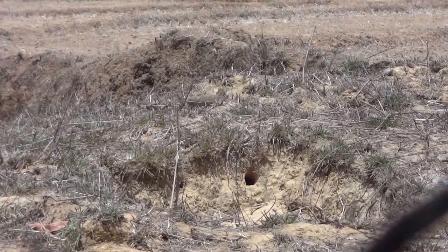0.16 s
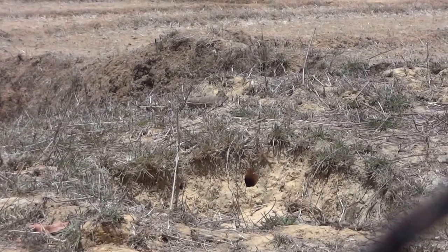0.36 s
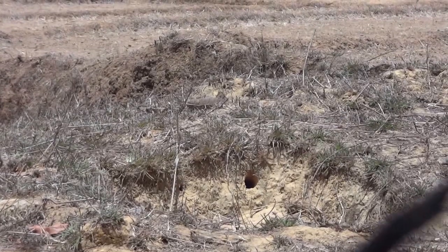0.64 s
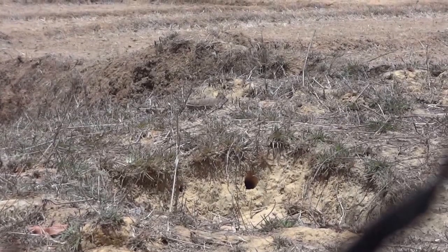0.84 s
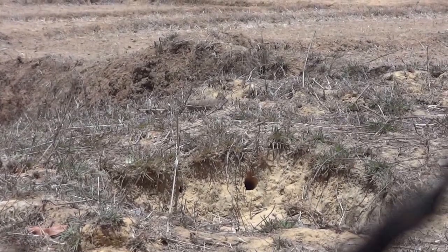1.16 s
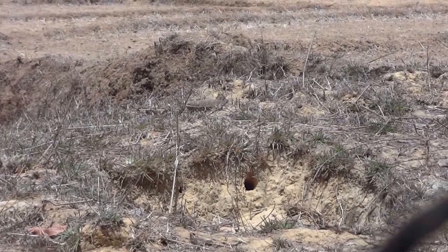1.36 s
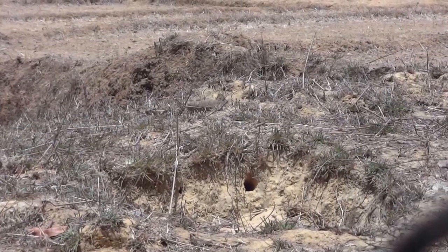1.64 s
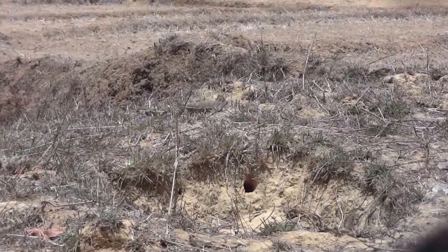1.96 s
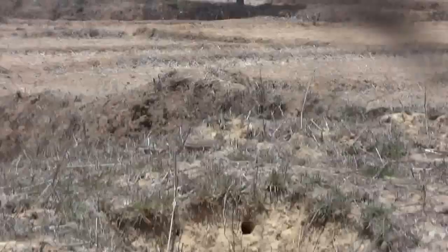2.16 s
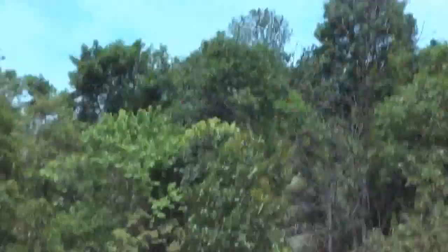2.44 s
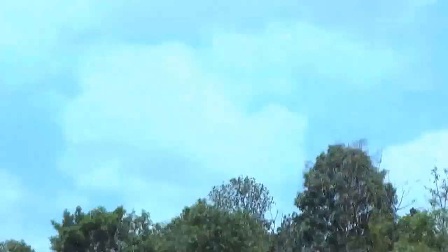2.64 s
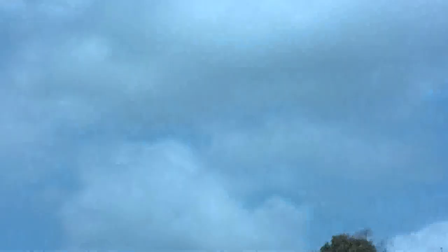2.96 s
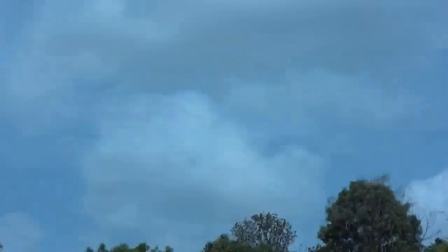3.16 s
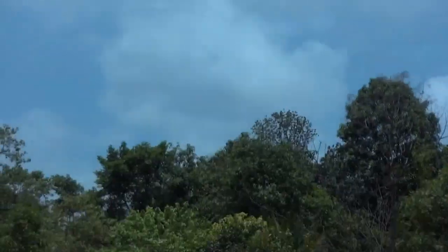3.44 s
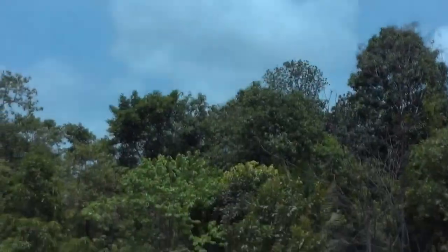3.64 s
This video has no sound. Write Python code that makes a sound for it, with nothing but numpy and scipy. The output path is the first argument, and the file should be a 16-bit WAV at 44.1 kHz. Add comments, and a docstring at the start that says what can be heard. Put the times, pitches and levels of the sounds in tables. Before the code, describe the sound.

Thin pure bird whistles repeat evenly from the start, lightly echoing off trees and an earth bank. Dry grass hisses around them, low wind bumps hit the microphone early, then stalk ticks and soft swishes.

```python
"""Wind hisses in dry grass and slowly eases; at once a bee-eater starts a thin falling whistle, about twice
a second. Early gusts buffet the microphone, blades swish, a few stalks tick and fainter birds answer.
Birds are pure gliding notes with echoes off trees and an earth bank; wind and grass are patchy shaped noise,
gusts, swishes and ticks short bursts of filtered noise."""
import sys
import numpy as np
from scipy import signal
from scipy.fft import rfft, irfft, next_fast_len
from scipy.io import wavfile
from scipy.ndimage import uniform_filter1d, map_coordinates

SR = 44100
rng = np.random.default_rng(int(sys.argv[2]) if len(sys.argv) > 2 else 0)


def master(y):
    """Save y as 16-bit WAV."""
    cut = np.clip(np.atleast_2d(y).T, -1, 1)
    pcm = np.round(cut * 32767)  # scale
    wavfile.write(sys.argv[1], SR, pcm.astype(np.int16))


N = 167580
T = np.arange(N) / SR  # time [s]

# Wind in the grass, before the offsets below: (time [s], treble level [dB], middle level [dB])
GRASS_LEVELS = [(0, -51.5, -50.5), (.11, -50, -47.5), (.16, -50, -50), (.3, -50.5, -50.5), (.45, -52, -51),
                (.62, -51, -52), (.9, -53, -50), (1.15, -53.5, -53), (1.27, -57.5, -53.5),
                (1.37, -54.5, -53), (2.2, -57.5, -53.5), (2.6, -55, -55), (2.8, -55, -51),
                (2.88, -55.5, -54.5), (3.13, -53.5, -55), (3.22, -55, -52.5), (3.28, -57.5, -54.5),
                (3.39, -57.5, -53.5), (3.8, -56.5, -56.5)]
# Spectra of fine hiss, rustle and distant wind: (frequency [Hz], level [dB])
HISS_SPECTRUM = [(1500, -30), (3200, -9), (5000, -2), (7000, -2), (9500, -3.5), (11500, -8), (13500, -14),
                 (15600, -24)]
RUSTLE_SPECTRUM = [(500, -28), (1200, -7.5), (2000, -3.5), (3000, 0), (4000, -2), (5200, -6), (7000, -13.5),
                   (12000, -24.5)]
AIR_SPECTRUM = [(25, -23), (60, -14.5), (120, -12), (220, -10), (400, -2), (750, 1), (1300, -1),
                (2200, -7.5), (4000, -26), (9000, -58)]
# Left-right likeness of the noise: (frequency [Hz], correlation [-1..1])
ALIKE = [(40, 0.88), (130, 0.8), (260, 0.36), (450, 0.39), (750, 0.43), (1300, .37), (2200, 0.71),
         (4500, 0.92), (8000, 0.89), (14000, 1)]
# Phase by which the left port trails the right: (frequency [Hz], lag [rad])
LEFT_LAG = [(60, 0.44), (250, 0.34), (600, 1.05), (1200, 0.98), (2000, 0.36), (2800, 0.41), (5000, 0.49),
            (10000, 0.13), (15000, 0.27)]
# Gusts on the microphone: (peak time [s], half-length [s], level [dB], lower edge [Hz], upper edge [Hz])
GUSTS = [(0.093, 0.03, -55, 50, 130), (.155, .014, -33, 85, 185), (.187, .034, -39, 220, 390),
         (0.196, 0.012, -37, 70, 181), (.228, 0.0099, -34.5, 110, 234), (0.253, .012, -35.5, 120, 222),
         (0.296, 0.077, -52, 60, 141), (0.411, 0.0094, -44.5, 70, 158), (0.486, .012, -59, 60, 150),
         (0.599, 0.032, -58.5, 70, 168), (0.898, .015, -62, 60, 150), (.968, 0.044, -57, 60, 170),
         (1.205, 0.022, -69, 45.3, 130), (2.034, 0.017, -67.5, 45, 120)]
# Spectrum of low wind noise between gusts: (frequency [Hz], level [dB])
RUMBLE_SPECTRUM = [(20, -5), (50, 7), (100, 1), (200, -9), (500, -40)]
# Bee-eater whistles: (time [s], length [s], settled pitch [Hz], time of the fall [s], level [dB],
# time of the level dip [s], dip depth [dB], echo level re note [dB])
WHISTLES = [(0.025, 0.19, 2760, .053, -44, .088, 15, -8.5), (.543, .18, 2745, 0.04, -42.5, 0.048, 3, -16),
            (1.058, .173, 2736, .034, -45.5, .003, 7, -11), (1.592, 0.17, 2702, 0.05, -44, 0.026, 11, -18),
            (2.158, 0.14, 2706, 0.0346, -42.5, 0.0034, 3.5, -17),
            (2.712, 0.14, 2710, .045, -45, 0.049, 5.5, -13.5),
            (3.353, .153, 2724, .022, -46.5, 0.041, 2, -12.5)]
# Swishes of grass blades, before the top fade: (peak time [s], half-length [s], level [dB], centre [Hz])
SWISHES = [(0.096, .025, -51, 9000), (.245, 0.023, -49, 3520), (0.545, 0.021, -47, 7200),
           (.69, .04, -54, 11800), (0.825, .018, -47, 4200), (1.645, .007, -52, 13000),
           (2.315, 0.011, -61, 11800), (2.81, .02, -53.5, 9000), (3.146, .012, -52, 7500)]
# Ticks of dry stalks, before the top fade: (time [s], level [dB], t60 [s], centre [Hz], Q [-])
TICKS = [(.1785, -41, 0.0044, 4000, 1.5), (.312, -30.5, 0.0085, 3300, 3), (.314, -40, 0.056, 2900, 3.2),
         (.905, -36, .006, 3200, 1.4), (1.645, -42, 0.012, 8000, .8), (1.962, -45, 0.0058, 3000, 1.4),
         (3.1295, -41.5, 0.039, 2720, 10)]
# Treble loss of ticks and swishes: (frequency [Hz], gain [dB])
TOP_FADE = [(9000, -3), (12000, -1), (15700, -13)]
# Notes of answering birds: (time [s], length [s], settled pitch [Hz], level [dB])
ANSWERS = [(0.277, 0.035, 3100, -49.5), (.32, .045, 3150, -59), (.743, 0.066, 2998, -45.5),
           (.813, .044, 3020, -49.5), (0.857, .048, 2110, -52.5), (.912, .085, 2100, -59.5),
           (3.191, .045, 3980, -56)]

HISS_OFFSET_DB, RUSTLE_OFFSET_DB = 1, 3
AIR_START_DB, AIR_EASES_DB_PER_S = -55, 0.33
GRAIN_DB = 2  # fine, short-lived patches in the grass noise
HISS_PAN_DB, RUSTLE_PAN_DB, AIR_PAN_DB = -0.3, 1.9, 0.5  # positive: left louder
RUMBLE_START_DB, RUMBLE_EASES_DB_PER_S = -65, 11.5
GUST_SLOPE, GUST_ALIKE, GUST_PAN_DB, GUST_LAG_S = 4.2, 0.6, 0.4, 0.001
LOW_CUT_HZ = 84  # the microphone passes little of a gust's lowest push
START_ABOVE_HZ, FALL_STEEPNESS, SAG_HZ_PER_S = 160, 3.1, 220
DROOP_HZ, DROOP_S = 90, 0.0077  # pitch gives way at the very end
ATTACK_S, RELEASE_S = 0.007, 0.016
FLUTTER_DB, FLUTTER_PER_S, WAVER_HZ = 1.3, 110, 7
BIRD_PAN_DB = 1.4
ECHO_T60_S, ECHO_RISE_S = 0.5, 0.012  # scatter from the trees
BANK_DB, BANK_DELAY_S, BANK_SPREAD_S = -1, 0.044, 0.009  # level re bee-eater's tree scatter
SWISH_WIDTH_OCT = 0.29
ANSWER_FALL_HZ, ANSWER_FALL_S = 70, 0.0216
ANSWER_ECHO_DB = -5  # farther birds carry more echo
TOP_HZ = 15750


def amp(db):
    """Decibels to gain."""
    return 10 ** (np.asarray(db) / 20)


def unit(x):
    """Scale to rms 1."""
    return x / np.sqrt(np.mean(x ** 2) + 1e-20)


def along(points, hz):
    """Read (frequency [Hz], value) points on a log axis."""
    f, v = np.transpose(points)
    return np.interp(np.log(hz + 1), np.log(f + 1), v)


def wobble(knots_per_s):
    """A smooth random curve."""
    return map_coordinates(rng.standard_normal(2000), [T * knots_per_s + 2], mode="mirror")


def filtered(x, response):
    """x times a response of frequency."""
    m = next_fast_len(N + SR // 2)
    return irfft(rfft(x, m) * response(np.fft.rfftfreq(m, 1 / SR)), m)[..., :N]


def pan(db):
    """Left and right gains for a level difference."""
    return amp(np.array([[db], [-db]]) / 2)


def ports(pair, lag):
    """Spacing of the two microphone ports: left trails right by lag(hz) radians."""
    return filtered(pair, lambda hz: np.exp(np.array([[-.5j], [.5j]]) * lag(hz)))


def rush(spectrum, patchy_db, grain_db=0):
    """Stereo noise of rms 1 with broad and fine time-frequency patches of random gain."""
    z = signal.stft(rng.standard_normal((2, N)), nperseg=512)[2]

    def field(size):
        smooth = uniform_filter1d(rng.standard_normal(z.shape[1:]), size, axis=0)
        return unit(uniform_filter1d(smooth, size, axis=1))

    patches_db = patchy_db * field(size=11) + grain_db * field(size=3)
    pair = signal.istft(z * amp(patches_db))[1][:, :N]

    def mid_side(hz):
        turn = np.arccos(np.clip(along(ALIKE, hz), -1, 1)) / 2  # mid/side balance sets the likeness
        return amp(along(spectrum, hz)) * [np.cos(turn), np.sin(turn)]

    mid, side = filtered(pair, mid_side)
    return unit(np.array([mid + side, mid - side]))


def tone(t, length, hz, db):
    """A pure note with quick attack and release, fluttering slightly in level and pitch."""
    gate = np.clip(t / ATTACK_S, 0, 1) * np.clip((length - t) / RELEASE_S, 0, 1)
    phase = 2 * np.pi * np.cumsum(hz + WAVER_HZ * wobble(FLUTTER_PER_S)) / SR
    level = amp(db + FLUTTER_DB * wobble(FLUTTER_PER_S))
    return np.sqrt(2) * gate * level * np.sin(phase)


def grass():
    """Distant wind, the grainy rustle of dry grass and its fine hiss, as shaped noise."""
    s, treble_db, middle_db = np.transpose(GRASS_LEVELS)
    hiss_db = np.interp(T, s, treble_db) + HISS_OFFSET_DB + 0.44 * wobble(29.93)
    rustle_db = np.interp(T, s, middle_db) + RUSTLE_OFFSET_DB + 0.43 * wobble(21.7) + 0.94 * wobble(400)
    air_db = AIR_START_DB - AIR_EASES_DB_PER_S * T
    hiss = rush(HISS_SPECTRUM, patchy_db=0.9, grain_db=GRAIN_DB) * amp(hiss_db)
    rustle = rush(RUSTLE_SPECTRUM, patchy_db=1.13, grain_db=GRAIN_DB) * amp(rustle_db)
    air = rush(AIR_SPECTRUM, patchy_db=1) * amp(air_db)
    return hiss * pan(HISS_PAN_DB) + rustle * pan(RUSTLE_PAN_DB) + air * pan(AIR_PAN_DB)


def buffeting():
    """Gusts, as bursts of low noise, cross the ports from the right over a rumble that dies away."""
    out = np.zeros((2, N))
    turn = np.arccos(np.clip(GUST_ALIKE, -1, 1)) / 2
    for s, half, db, low_hz, high_hz in GUSTS:
        def band(hz):
            low_edge = hz ** 2 / np.hypot(hz ** 2, low_hz ** 2)
            high_edge = 1 / np.hypot(1, (hz / high_hz) ** GUST_SLOPE)
            return low_edge * high_edge * hz / np.hypot(hz, LOW_CUT_HZ)

        swell = np.exp(1 - np.hypot(1, 2 * (T - s) / half))
        swell_rms = np.sqrt(np.mean(swell ** 2))
        mid, side = [unit(v * swell) * swell_rms for v in filtered(rng.standard_normal((2, N)), band)]
        out += amp(db) * (np.cos(turn) * mid + np.sin(turn) * np.array([side, -side]))
    rumble_db = RUMBLE_START_DB - RUMBLE_EASES_DB_PER_S * T + 2 * wobble(9.9)
    rumble = rush(RUMBLE_SPECTRUM, patchy_db=1.5) * amp(rumble_db)
    return ports(out, lambda hz: 2 * np.pi * hz * GUST_LAG_S) * pan(GUST_PAN_DB) + rumble


def bee_eater():
    """Pure whistles fall, sag, dip in level and droop; returns direct sound and echo feed."""
    direct, echoing = np.zeros((2, N))
    for s, length, hz, fall_s, db, dip_s, dip_db, echo_db in WHISTLES:
        t = np.clip(T - s, 0, length)
        fall_hz = START_ABOVE_HZ / (1 + (t / fall_s) ** FALL_STEEPNESS)
        sag_hz = SAG_HZ_PER_S * (length / 2 - t)
        droop_hz = DROOP_HZ * np.exp((t - length) / DROOP_S)
        dip = dip_db * np.exp(-((t - dip_s) / (0.014 + 0.17 * dip_s)) ** 2)
        note = tone(t, length, hz + fall_hz + sag_hz - droop_hz, db - dip)
        direct += note
        echoing += amp(echo_db) * note
    return direct, echoing


def trees(x):
    """Diffuse scatter: decaying noise as impulse response, different on each side."""
    t = T[:SR]
    tail = rng.standard_normal((2, SR)) * amp(-60 * t / ECHO_T60_S) * np.clip(t / ECHO_RISE_S, 0, 1)
    return signal.fftconvolve(x[None], tail / np.linalg.norm(tail[0]), axes=1)[:, :N]


def bank(x):
    """One short, blurred reflection from an earth bank, the same on both sides."""
    t = T[:SR // 4]
    blur = rng.standard_normal(SR // 4) * np.exp(-((t - BANK_DELAY_S) / BANK_SPREAD_S) ** 2)
    return signal.fftconvolve(x, blur / np.linalg.norm(blur))[:N]


def swishes():
    """Blades brush together: short puffs of high band noise."""
    out = np.zeros(N)
    for s, half, db, centre_hz in SWISHES:
        def band(hz):
            return np.exp(-.5 * (np.log2((hz + 1) / centre_hz) / SWISH_WIDTH_OCT) ** 2)

        puff = np.exp(-((T - s) / half) ** 2)
        out += unit(filtered(rng.standard_normal(N), band)) * amp(db) * puff
    return out


def stalks():
    """Tiny dry snaps: decaying noise bursts, each in one resonance."""
    out = np.zeros(N)
    for s, db, t60_s, centre_hz, q in TICKS:
        def resonance(hz):
            loss = 1j * hz * centre_hz
            return loss / (q * (centre_hz ** 2 - hz ** 2) + loss)

        decay = (T >= s) * amp(db - 60 * np.abs(T - s) / t60_s)
        out += unit(filtered(rng.standard_normal(N), resonance)) * decay
    return out * pan(RUSTLE_PAN_DB)


def answers():
    """Short pure notes of other birds, each falling slightly at its start."""
    out = np.zeros(N)
    for s, length, hz, db in ANSWERS:
        t = np.clip(T - s, 0, length)
        out += tone(t, length, hz + ANSWER_FALL_HZ * np.exp(-t / ANSWER_FALL_S), db)
    return out


def scene():
    """Birds and grass reach the two microphone ports; gusts hit the ports directly."""
    near, echoing = bee_eater()
    far = answers()
    birds = (near + far + amp(BANK_DB) * bank(echoing)) * pan(BIRD_PAN_DB)
    birds = birds + trees(echoing + amp(ANSWER_ECHO_DB) * far)
    blades = filtered(swishes() + stalks(), lambda hz: amp(along(TOP_FADE, hz)))
    return ports(birds + grass() + blades, lambda hz: along(LEFT_LAG, hz)) + buffeting()


def record(dry):
    """Band limit: keeps nothing at or above TOP_HZ."""
    return filtered(dry, lambda hz: hz < TOP_HZ)


dry = scene()
out = record(dry)
master(out)
```